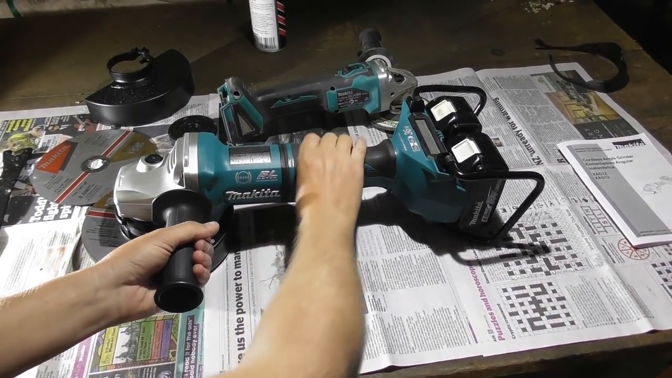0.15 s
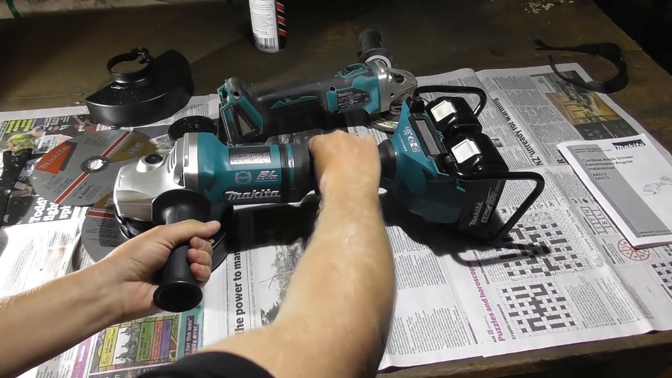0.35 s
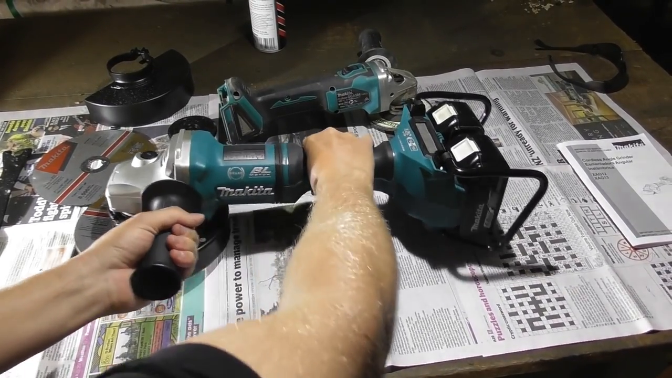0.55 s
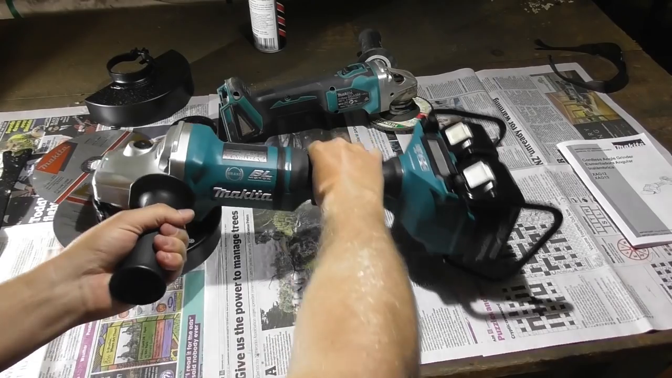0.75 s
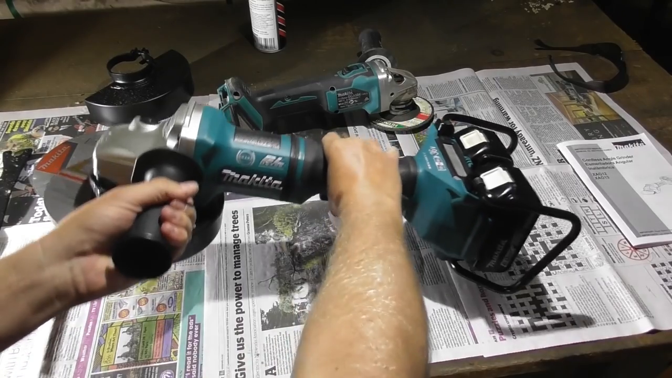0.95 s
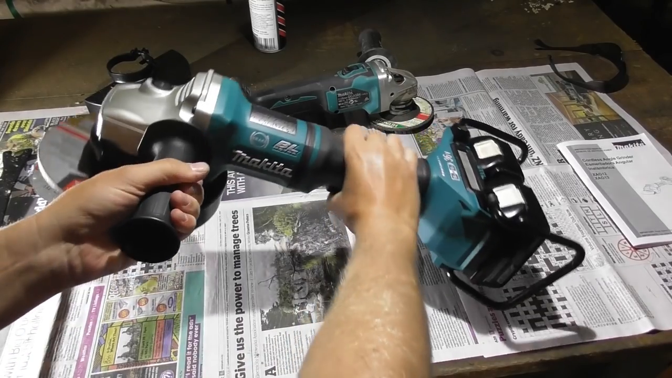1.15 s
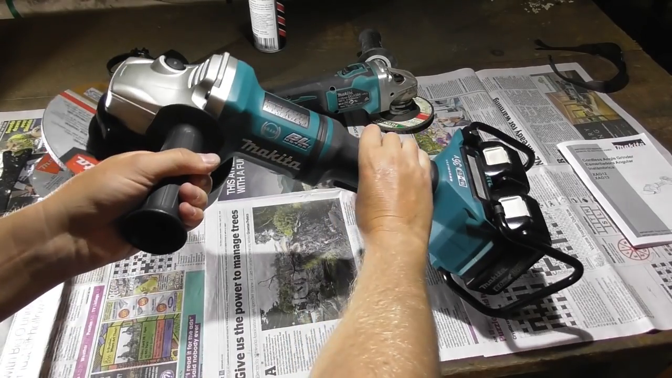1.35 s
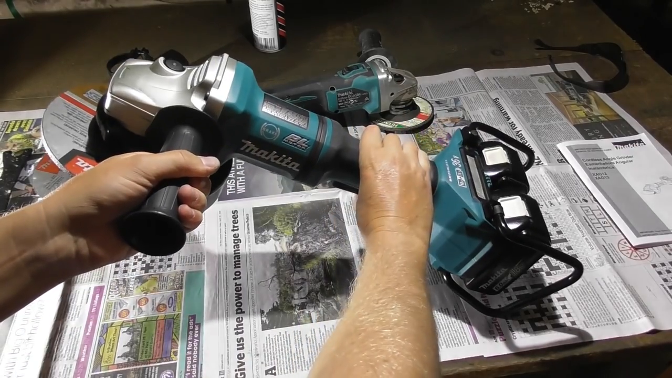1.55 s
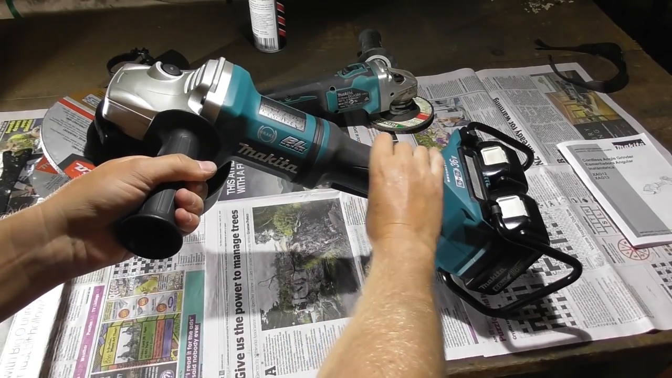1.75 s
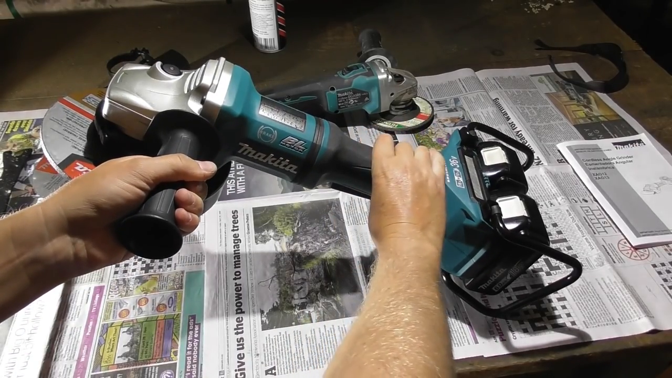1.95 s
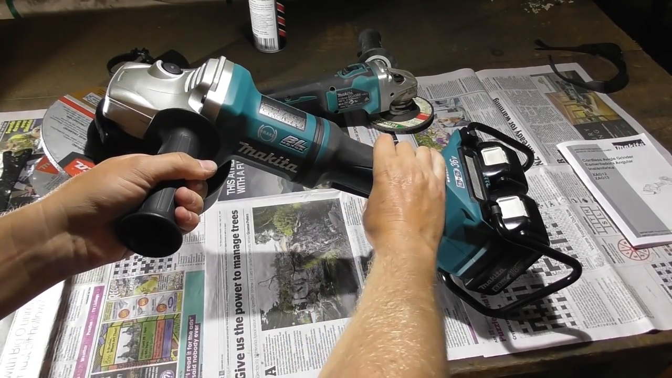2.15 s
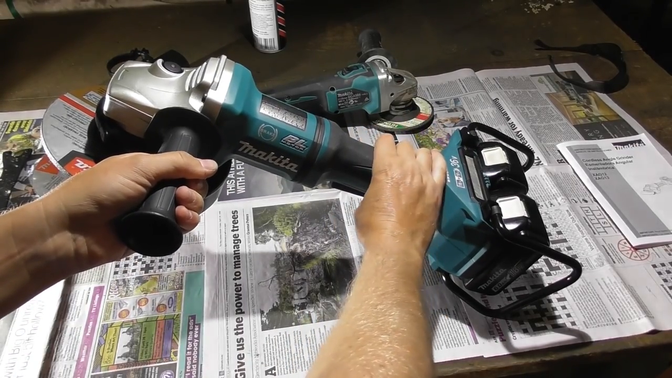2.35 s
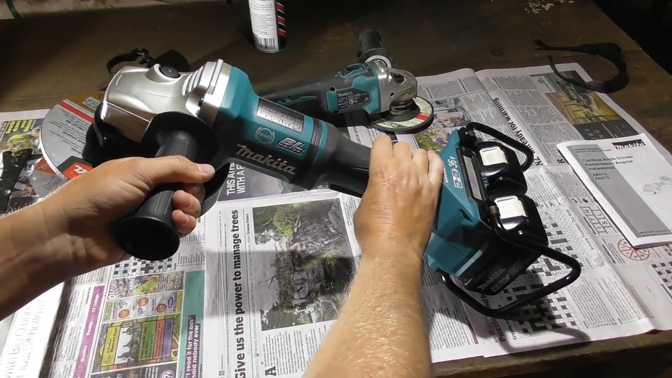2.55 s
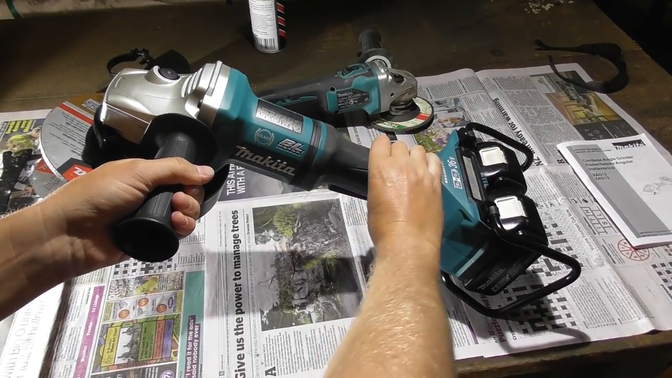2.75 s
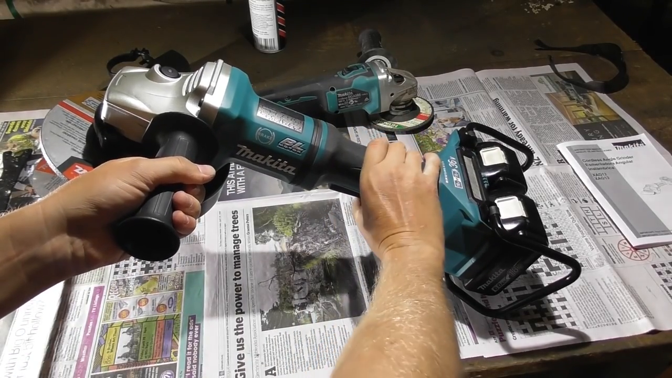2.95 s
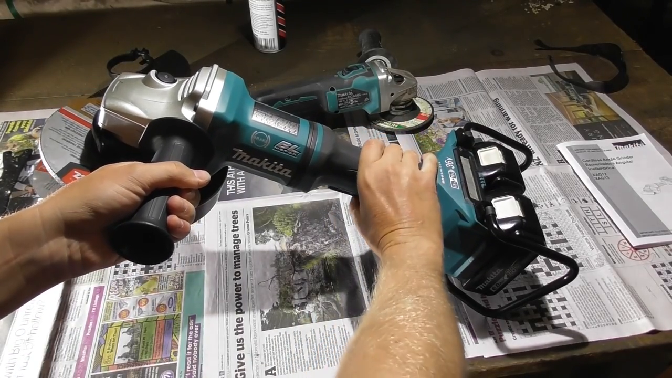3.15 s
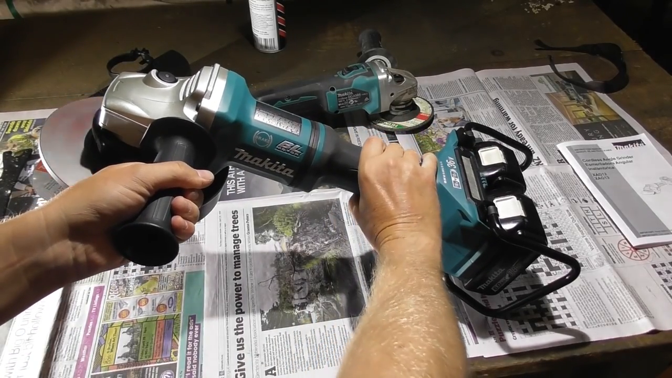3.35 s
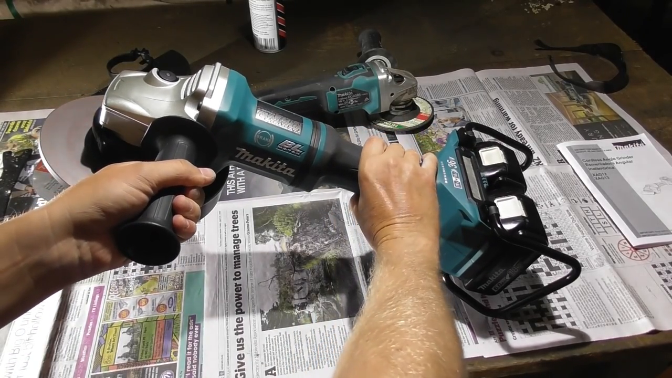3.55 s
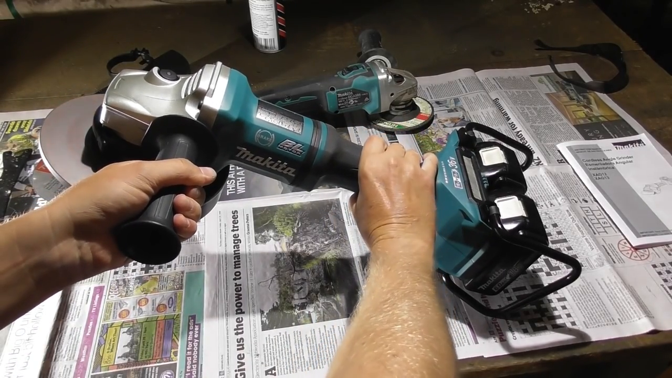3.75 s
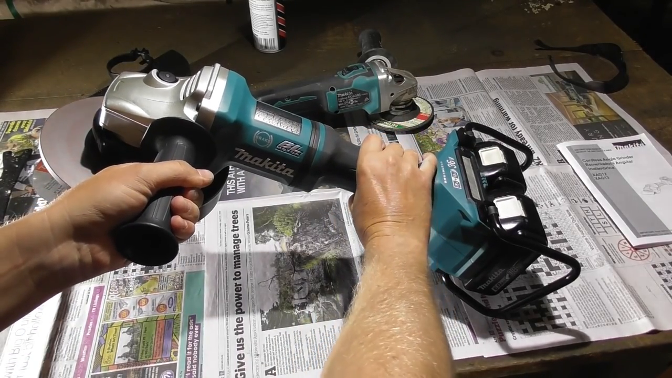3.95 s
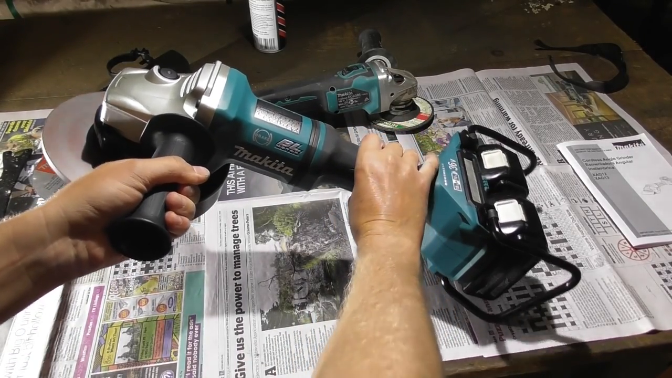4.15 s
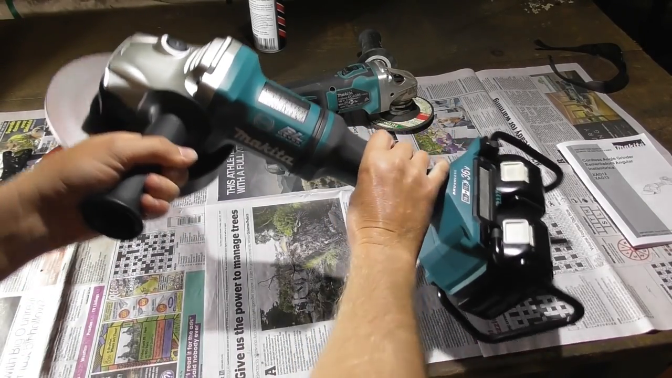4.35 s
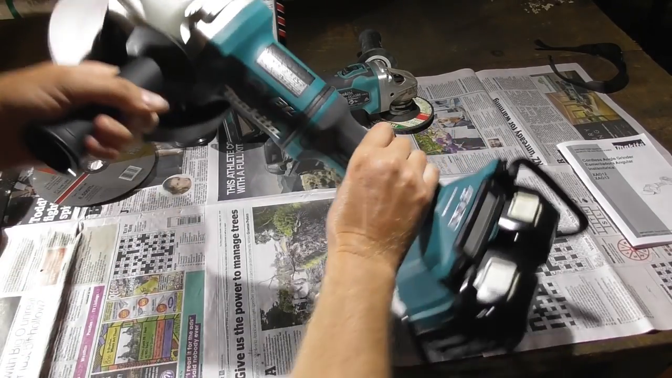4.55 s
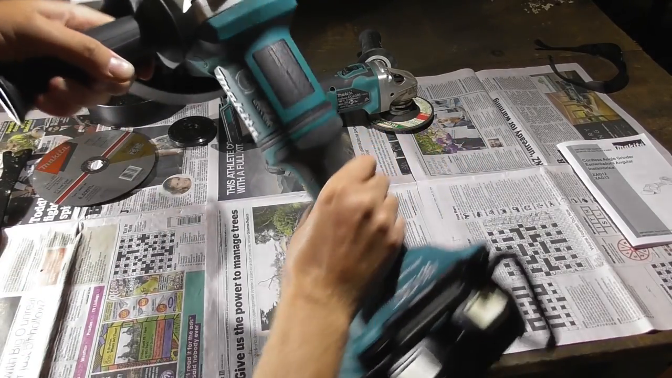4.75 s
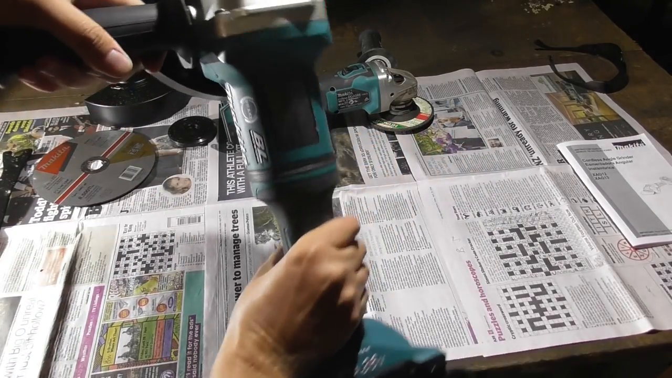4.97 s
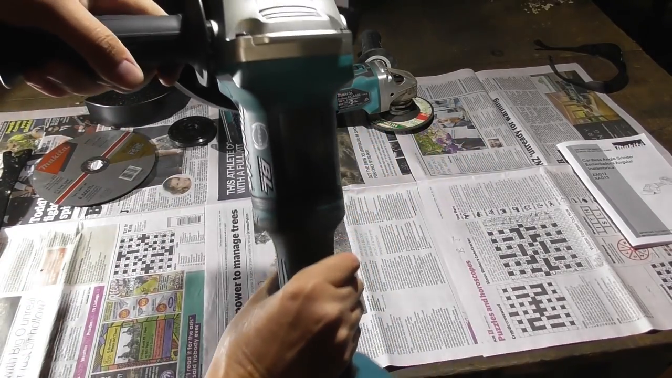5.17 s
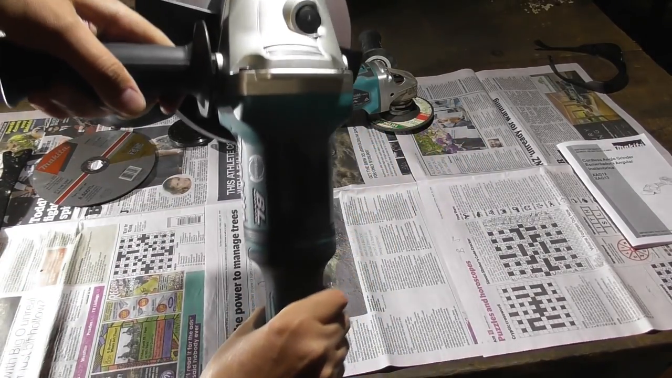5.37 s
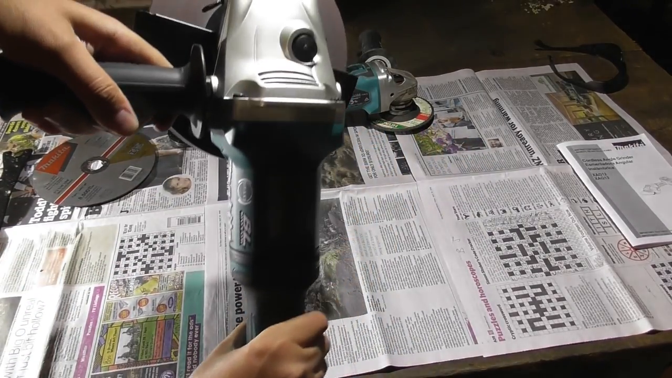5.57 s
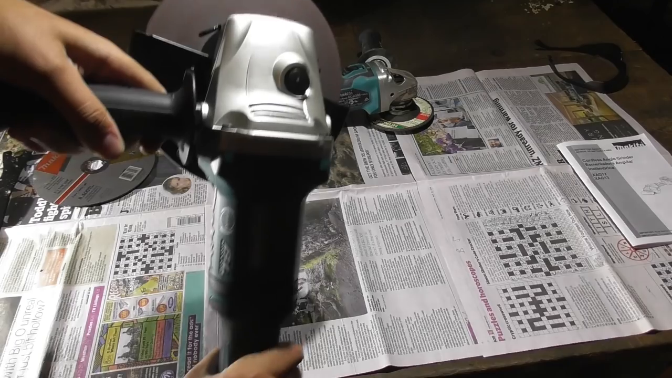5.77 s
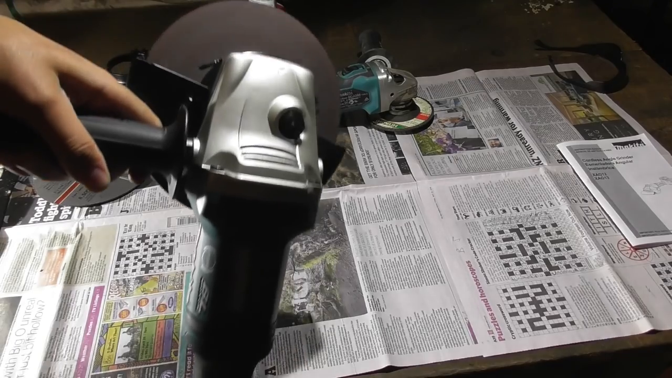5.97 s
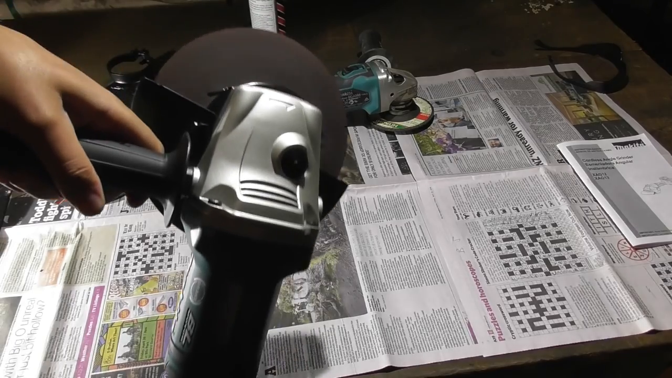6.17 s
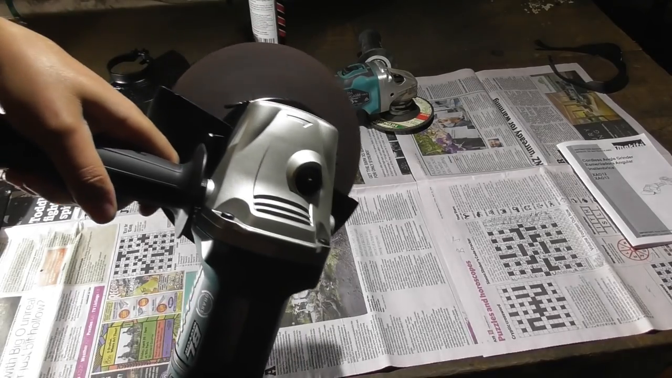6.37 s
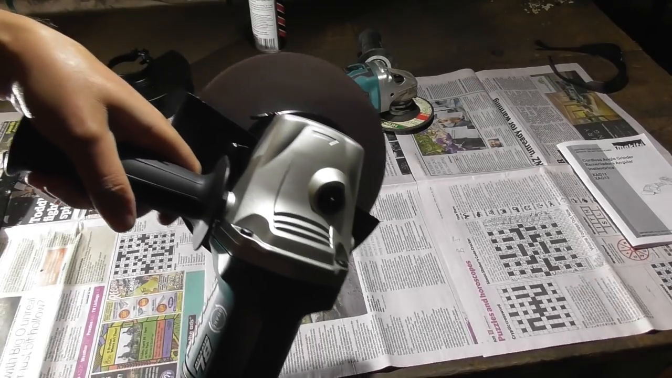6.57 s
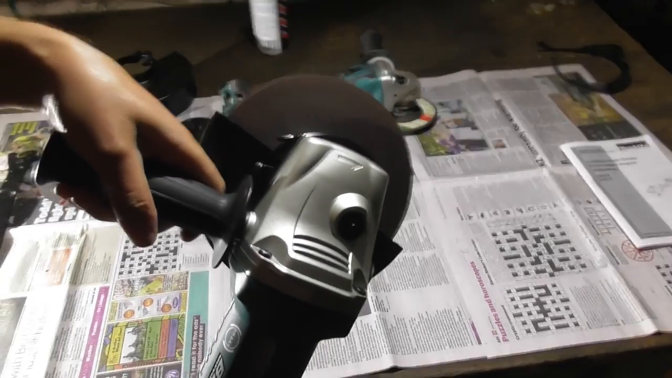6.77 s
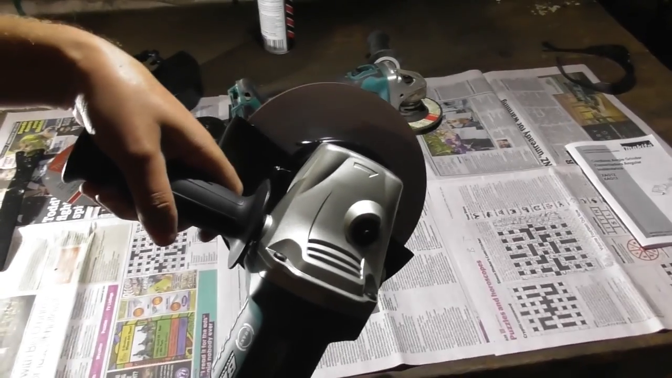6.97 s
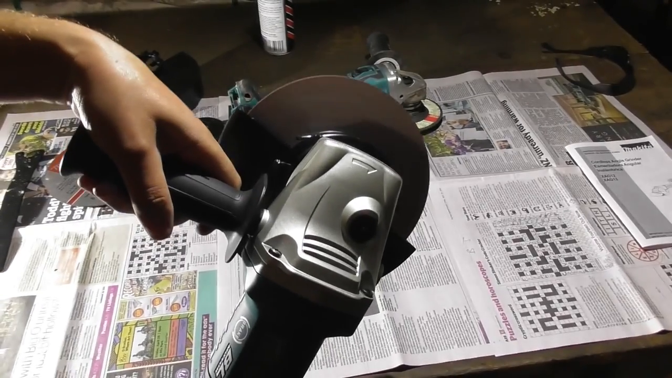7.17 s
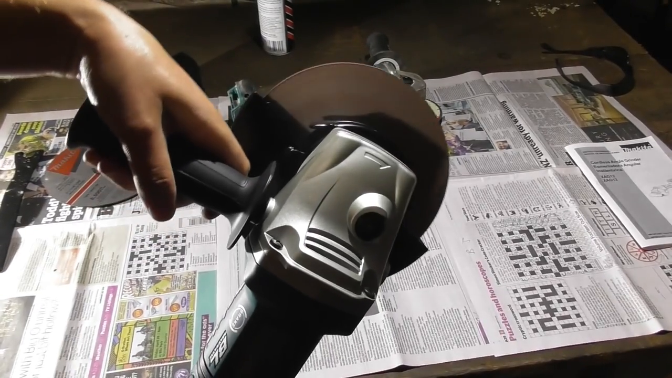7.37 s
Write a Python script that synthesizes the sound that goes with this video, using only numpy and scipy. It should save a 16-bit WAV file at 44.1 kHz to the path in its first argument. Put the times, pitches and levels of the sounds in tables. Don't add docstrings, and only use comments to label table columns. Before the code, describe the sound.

A low room hum and faint hiss lie under small finger knocks, grip rubs and one solid bench thud. A grip knock and tick come just before the loud switch snap. The grinder rattles abruptly, its motor and gear pitch racing up, then holds a harsh steady roar with whirring fan tone. Close stereo camera microphone, short room ring; the tone shifts slightly as the tool is turned and brought nearer.

```python
import sys
import numpy as np
from scipy import signal
from scipy.fft import rfft, irfft, next_fast_len
from scipy.io import wavfile
from scipy.ndimage import uniform_filter1d

SR = 44100
rng = np.random.default_rng(int(sys.argv[2]) if len(sys.argv) > 2 else 0)


def transcribe(u):
    v = np.clip(np.atleast_2d(u).T, -1, 1)
    q = np.round(v * 32767).astype(np.int16)
    wavfile.write(sys.argv[1], SR, q)


def ratio_of_db(decibels):
    return 10 ** (np.asarray(decibels, float) / 20)


N = 327222
T = np.arange(N) / SR
M = next_fast_len(N)
HZ = np.maximum(np.arange(M // 2 + 1) * SR / M, 1)
TEETH = 10
START_S = 3.33
RATTLE_END_S = 3.65

# t/s, shaft f/Hz
SHAFT_SPEED = [(3.33, 22), (3.39, 56), (3.46, 97.5), (3.54, 141.5), (3.64, 194), (3.75, 248.5), (3.82, 280),
               (3.88, 298.5), (3.94, 314), (3.99, 335), (4.04, 348), (4.11, 359), (4.17, 374.5),
               (4.27, 391.5), (4.436, 411), (4.62, 424.3), (4.836, 431.4), (5.4, 435.2)]
# t/s, head turned from side view [0-1], vents near camera [0-1]
TOOL_POSE = [
    (4.4, 0.1, 0),
    (4.8, 0.22, 0),
    (5.2, 1, 0),
    (5.75, 0.82, 0.14),
    (6.0, 1, 0.52),
    (6.3, 0.76, 0.55),
    (7.0, 1, 1.05),
    (7.42, 0.63, 1.1),
]


def grinder():
    shaft_hz = uniform_filter1d(curves(SHAFT_SPEED)[0], SR // 36)
    turned, near = curves(TOOL_POSE)
    on = np.clip((T - START_S + 0.012) / 0.03, 0, 1)
    turns = np.cumsum(shaft_hz * on * (1 + 0.0004 * walk(9))) / SR
    slack = (shaft_hz / shaft_hz.max()) ** 4.0
    state = np.array([np.ones(N), slack ** 2, turned, near])
    tooth = (TEETH * turns).astype(int)
    grain = tooth_bite(tooth)
    tones = mic(fan_tones(shaft_hz, turns, slack, state) + mesh_whine(shaft_hz, turns, slack, state))
    tones = tones + slack ** 2 * (0.27 + 0.74 * turned) * drive_tones(turned)
    case = shop(on * gear_case(tooth, grain))
    noise = air_roar(grain, shaft_hz, turned, near) + steel(grain, turned)
    return on * (noise + np.sqrt(2) * tones + case) + clatter()


def tooth_bite(tooth):
    bite_db = 0.93 * rng.standard_normal(TEETH)[tooth % TEETH]
    bite_db = bite_db + 1.7 * rng.standard_normal(N // 8)[tooth]
    return ratio_of_db(bite_db + 0.57 * walk(150))


# f/Hz, width/Hz, level/dB
SHELL_MODES = [(300, 90, 5), (466, 67, 3), (580, 110, 9), (684, 79, 12), (1075, 160, 12.5),
               (1405, 190, 14.5), (1987, 210, 14), (2400, 230, 11.5), (2820, 130, 8), (3030, 84, 12),
               (3303, 160, 10.5), (3480, 100, 8), (3580, 140, -8), (3840, 80, 6)]
# f/Hz, width/Hz, level/dB
HEAD_MODES = [(4100, 430, 5.5), (4220, 120, 6), (4500, 150, 8), (7300, 300, 5), (7870, 960, 12),
              (8300, 300, 4)]


def line_db(order, row, shaft_hz, state):
    whole_hz = np.arange(SR // 2)
    body_db = peaks_db(whole_hz, SHELL_MODES) + peaks_db(whole_hz, HEAD_MODES)
    return np.array(row) @ state + body_db[(order * shaft_hz).astype(int)]


FAN_ORDERS = [8, 16, 9, 4, 2, 1, .45, 3, 1.3235]
# level under load/dB, change at full speed/dB, change turned/dB, change near/dB
FAN_LEVELS = [(-64, 18.5, -7.5, 0.5), (-46, -15, 4, 11), (-57, -1, -3, -10), (-67.5, 13, -2, 5),
              (-56, -9, 4.5, -2), (-55, -14, 4.5, -4), (-49, -36, -6, 2), (-62, -5, -1, -4),
              (-62.5, -5.5, 3, 1.5)]


def fan_tones(shaft_hz, turns, slack, state):
    tones = 0
    for order, row in zip(FAN_ORDERS, FAN_LEVELS):
        level_db = line_db(order, row, shaft_hz, state)
        level_db = level_db + (2.0 + 1.2 / max(order, 1)) * walk(30) + 1.5 * slack * walk(6)
        radiated = 1 / (1 + (190 / (order * shaft_hz)) ** 4)
        phase = 2 * np.pi * (order * turns + rng.random()) + 0.064 * order * slack * walk(60)
        tones = tones + ratio_of_db(level_db) * radiated * np.sin(phase)
    return tones


MESH_ORDERS = [10, 20, 9, 11, 12, 19, 21, 11.5, 10.5, 22]
# level under load/dB, change at full speed/dB, change turned/dB, change near/dB
MESH_LEVELS = [(-42, -15, -0.5, -14), (-52, -6, -10, -1), (-57, 6, -10, -14), (-57, 9, -6, -5),
               (-61, 8, -6, -6), (-61, -2, -14, -3), (-59, 0, -12, -3), (-55.5, 2, -10, -3),
               (-58, 2, -8, -3), (-60, 0, -12, -3)]


def mesh_whine(shaft_hz, turns, slack, state):
    tones = 0
    for order, row in zip(MESH_ORDERS, MESH_LEVELS):
        chatter_rad = (0.035 + 0.19 * slack ** 3.7) * order
        level_db = line_db(order, row, shaft_hz, state) + 2.4 * walk(45)
        tones = tones + ratio_of_db(level_db) * np.sin(2 * np.pi * order * turns + chatter_rad * walk(260))
    return tones


# f/Hz, level/dB, side-view change/dB
DRIVE_LINES = [(489, -58, 0), (781, -52, -2), (1530, -71, 0), (7763, -71, 0), (8436, -64, 24)]


def drive_tones(turned):
    tones = 0
    for hz, db, side_db in DRIVE_LINES:
        level_db = db + side_db * (1 - turned) + 2.8 * walk(10)
        tones = tones + ratio_of_db(level_db) * np.sin(2 * np.pi * hz * T + 0.6 * walk(40))
    return tones


# f/Hz, width/Hz, level/dB
CASE_MODES = [(504, 190, -1.5), (2140, 155, 3.5), (2415, 70, -4), (3200, 160, -23), (3400, 120, 1),
              (4440, 190, 1), (3920, 120, -5), (5600, 200, -2), (7400, 460, -21), (10000, 400, -19)]


def gear_case(tooth, grain):
    blows = np.diff(tooth, prepend=0) * grain * rng.standard_normal(N)
    modes = sum(ratio_of_db(db) * np.sqrt(width) * ring(hz, 4.5 / width, 0.1) for hz, width, db in CASE_MODES)
    case = mic(signal.fftconvolve(blows, modes)[:N])
    case = signal.lfilter(*signal.butter(2, 330, "high", fs=SR), case)
    load = ratio_of_db(-31.0 - 7.7 * (T - START_S).clip(0))
    return load * case / np.sqrt(uniform_filter1d(case ** 2, SR // 8) + 1e-9)


# f/Hz, density/dB per Hz
ROAR_COLOUR = [(30, -35.5), (170, -19.5), (364, -11), (560, -11.5), (801, -4), (1550, -7), (1850, -5.5),
               (3300, 0), (4600, -7), (4710, -14.5), (5050, -24), (6300, -20.5), (7000, -18),
               (11400, -15.5), (16000, -33.5)]
# f/Hz, width/Hz, level/dB
GUARD_PEAKS = [(1040, 320, 3), (1925, 220, 6.5), (2120, 440, -2), (2610, 115, 3.5), (3110, 57, 3.5),
               (3540, 78, -4), (4100, 190, 2), (7000, 170, 4), (7820, 2200, 3.5), (9730, 950, -4),
               (6250, 420, -2)]
# f/Hz, correlation
ROAR_ALIKE = [(60, -1.4), (130, -0.21), (290, 0.84), (640, 0.91), (1410, 0.96), (3100, 0.94), (6820, 0.95),
              (15000, 0.56)]
# f/Hz, left minus right/dB
ROAR_SIDE = [(60, -15), (110, 3), (200, -5.5), (380, 1), (700, 5.5), (1290, 2.5), (2380, -0.5), (4400, -4),
             (8120, 2.5), (15000, 6)]
# low f/Hz, high f/Hz
ROAR_BANDS = [(250, 1200), (1500, 4500), (6500, 9000), (10000, 15000)]


def air_roar(grain, shaft_hz, turned, near):
    colour_db = at(ROAR_COLOUR, HZ) + peaks_db(HZ, GUARD_PEAKS)
    levels_db = roar_levels(shaft_hz, turned, near)
    return wash(grain, colour_db, ROAR_ALIKE, ROAR_SIDE, ROAR_BANDS, levels_db, 0.42, 14)


# level at speed/dB, growth [power of speed], change turned/dB, change near/dB
AIR_LEVELS = [(-36.5, 3.3, 1.5, 2.5), (-29.5, 2.1, 1, 2), (-38, 4.1, -6, 4.5), (-45.5, 1.5, 7.5, 0.5)]
# peak level/dB, peak t/s, rise/dB per s, fall/dB per s
RATTLE_LEVELS = [(-26.5, 3.425, 60, 84), (-26.5, 3.39, 150, 43), (-41.5, 3.46, 141, 27),
                 (-46.5, 3.57, 120, 3.5)]


def roar_levels(shaft_hz, turned, near):
    speed = shaft_hz / 316
    growth_db = 20 * np.log10(speed) - 2.5 * np.log10(1 + speed ** 8)
    air_db = np.array([db + power * growth_db + turn_db * turned + near_db * near
                       for db, power, turn_db, near_db in AIR_LEVELS])
    rattle_db = np.array([db - rise * (s - T).clip(0) - fall * (T - s).clip(0)
                          for db, s, rise, fall in RATTLE_LEVELS])
    rattle_db = rattle_db - 120.5 * (T - RATTLE_END_S).clip(0)
    return 10 * np.log10(ratio_of_db(air_db) ** 2 + ratio_of_db(rattle_db) ** 2)


# f/Hz, width/Hz, level in start rattle/dB, level near mesh overtone/dB, level turned/dB
STEEL_BANDS = [(4120, 780, -45, -31, -39.5), (5980, 400, -48.5, -70, -60), (7300, 380, -62, -48, -60),
               (7790, 670, -46.5, -48, -60), (10100, 760, -51.5, -61, -60), (8430, 200, -66, -48, -56),
               (8130, 520, -60, -45, -65), (5380, 740, -59, -69, -54.5)]


def steel(grain, turned):
    rattle = np.clip((T - RATTLE_LEVELS[0][1] + 0.055) / 0.051, 0, 1)
    rattle = rattle * ratio_of_db(-300 * (T - RATTLE_END_S).clip(0))
    sing = np.exp(-((T - 4.25) / 0.47) ** 2)
    noise = rng.standard_normal((3, N))
    source = grain * (noise[0] + 0.43 * noise[1:])
    out = 0
    for hz, width, rattle_db, sing_db, turn_db in STEEL_BANDS:
        edges_hz = [hz - width / 2, hz + width / 2]
        band = signal.sosfilt(signal.butter(4, edges_hz, "band", fs=SR, output="sos"), source)
        gain = rattle * ratio_of_db(rattle_db) + sing * ratio_of_db(sing_db) + turned * ratio_of_db(turn_db)
        out = out + band / band.std() * ratio_of_db(3.0 * walk(40)) * gain
    return out


# t/s, peak level/dB, steel ring/dB
GEAR_BLOWS = [(3.3165, -27, -4), (3.366, -23.5, -16), (3.382, -25, -17), (3.398, -17, -20),
              (3.406, -17, -22), (3.4155, -13.5, -17.5), (3.451, -21, -20), (3.473, -27, -16),
              (3.536, -27, -14), (3.648, -28, -10), (3.7214, -24, -14), (4.0322, -23, -16)]
# f/Hz, level/dB, t60/s
BLOW_CASE = [(473, -2, 0.035), (670, 2, 0.031), (2050, -7, .015), (3305, -1, .012)]
# f/Hz, level/dB, t60/s
BLOW_STEEL = [(5950, -1, .02), (7900, 0, .025)]


def clatter():
    track = np.zeros(N)
    for s, db, steel_db in GEAR_BLOWS:
        tight_db = -120 * max(s - 3.42, 0)
        for modes, gain_db in ((BLOW_CASE, db), (BLOW_STEEL, db + steel_db)):
            blow = 0
            for hz, mode_db, t60 in modes:
                level_db = mode_db + 2 * rng.standard_normal() + (hz < 1000) * tight_db
                blow = blow + ratio_of_db(level_db) * ring(hz * (1 + 0.015 * rng.standard_normal()), t60, 0.1)
            add(track, s, blow, gain_db)
    return shop(signal.lfilter(*signal.butter(3, 330, "high", fs=SR), track))


# f/Hz, left minus right/dB
HANDS_SIDE = [(100, -5), (250, -3), (500, 3), (1000, 2), (3000, -3), (10000, 0.5)]


def hands():
    track = np.zeros(N)
    bench_bumps(track)
    shell_knocks(track)
    switch_ticks(track)
    rubs(track)
    balance = ratio_of_db(np.outer([0.5, -0.5], at(HANDS_SIDE, HZ)))
    return irfft(rfft(shop(mic(track)), M) * balance, M)[:, :N]


# f/Hz, level/dB, t60/s
BENCH_MODES = [(70, -18, 0.3), (145, -17, 0.38), (150.9, -4, 0.45), (247.1, -1.5, 0.37), (298, -4, 0.3),
               (332, -7.5, 0.087), (366, -2.5, 0.18), (378, -13, 0.32), (521, -14, 0.23),
               (565, -12.5, 0.23), (689, -13, 0.25), (776, -26, 0.4), (1034, -27, 0.2), (1125, -30, 0.15)]
# t/s, peak level/dB, push/ms, direction
BENCH_BUMPS = [
    (0.8297, -1.5, 1.23, 1),
    (1.366, -29, 6.2, -1),
    (1.42, -35, 1.4, -1),
    (3.315, -40, 6.1, -1),
    (4.946, -34.5, 5.2, 1),
    (5.436, -44, 1.5, 1),
    (6.98, -36.5, 1.7, 1),
]


def bench_bumps(track):
    for s, db, push_ms, way in BENCH_BUMPS:
        body = sum(ratio_of_db(g) * ring(hz, 0.88 * t60, 0.5) for hz, g, t60 in BENCH_MODES)
        body = body + ratio_of_db(12) * burst(0.25, 150, 510) + ratio_of_db(7) * burst(0.3, 560, 1270)
        body = signal.lfilter(*signal.butter(2, 105, "high", fs=SR), body)
        push = np.hanning(int(push_ms * SR / 1000) + 3)
        add(track, s, way * np.convolve(body, push), db)


# t/s, peak level/dB, shell f/Hz, t60/s
SHELL_KNOCKS = [
    (0.239, -25, 645, 0.1),
    (.264, -35, 600, .08),
    (4.93, -29, 425, 0.1),
    (0.49, -30.5, 446, 0.063),
    (0.533, -43, 820, 0.22),
    (0.679, -37.5, 554, 0.064),
    (2.957, -22, 402, 0.093),
    (3.213, -35.5, 980, 0.076),
    (3.3, -31, 413, 0.051),
    (3.3163, -10.5, 760, 0.02),
]


def shell_knocks(track):
    for s, db, hz, t60 in SHELL_KNOCKS:
        modes = ring(hz, 0.65 * t60, 0.5) + 0.34 * ring(0.6 * hz, 0.5 * t60, 0.5)
        add(track, s, modes + 2.0 * burst(3.2 * t60, 0.72 * hz, 1.03 * hz), db)


# t/s, peak level/dB, ring f/Hz, t60/s, treble/dB
SWITCH_TICKS = [(0.147, -29, 1900, .02, -25), (1.417, -38, 1500, 0.015, -20),
                (0.2346, -37, 2300, 0.039, -26), (0.367, -44, 3700, 0.024, -26.5),
                (0.435, -37, 2010, 0.02, -26), (0.4947, -45, 2050, 0.024, -25),
                (0.5342, -44, 3530, 0.024, -19), (0.678, -38.5, 1490, 0.023, -31),
                (0.8322, -24, 3030, 0.03, -17), (1.352, -51, 1710, 0.024, -4),
                (2.188, -40.5, 3300, 0.03, -14), (2.718, -38, 3340, 0.02, -18),
                (2.959, -22.5, 2190, 0.018, -25), (3.213, -29.5, 2950, 0.042, -13),
                (3.26, -41, 3060, 0.03, -21), (3.2984, -29, 2290, 0.015, -31.5),
                (3.3163, -10, 3110, 0.034, -14.5)]


def switch_ticks(track):
    for s, db, hz, t60, treble_db in SWITCH_TICKS:
        tick = burst(0.5 * t60, 750, 0.96 * hz) + 0.24 * burst(2.85 * t60, 970, 3070)
        add(track, s, tick + 0.17 * ring(hz, 1.0 * t60, 0.5), db - 0.5)
        add(track, s, burst(0.3 * t60, 5400, 16500), db + treble_db + 15.5)


# t/s, length/s, level/dB, low f/Hz,
# high f/Hz
HAND_RUBS = [(0.004, .1, -68, 2800, 4200), (0.11, 0.12, -49.5, 800, 3300), (.12, .1, -53, 5000, 15000),
             (0.13, 0.033, -49, 990, 2600), (.25, 0.36, -56, 570, 740), (0.53, 0.1, -66, 2900, 3600),
             (0.55, .1, -57, 5700, 15000), (.7, .12, -68, 2900, 4100), (.84, 0.3, -46, 32, 234),
             (1.245, 0.12, -65.5, 2700, 4200), (1.39, 0.074, -54, 230, 790), (1.69, 0.19, -64, 3000, 3800),
             (1.76, 0.11, -61, 7000, 15000), (2.52, 0.18, -66, 3100, 3860), (2.747, 0.097, -67, 3300, 4600),
             (2.952, 0.052, -40.5, 480, 810), (2.96, 0.054, -56.5, 3200, 3500),
             (3.312, 0.027, -31, 20, 290), (3.36, 0.071, -30, 400, 540), (4.925, 0.09, -48, 200, 620),
             (4.925, .03, -59, 30, 160), (4.95, .15, -56, 110, 300)]


def rubs(track):
    for s, length_s, db, lo_hz, hi_hz in HAND_RUBS:
        slide = burst(np.inf, lo_hz, hi_hz)[:int(length_s * SR)]
        add(track, s, slide * np.hanning(len(slide)) ** 0.39, db + 11.0)


# t/s, effort [0-1]
HAND_EFFORT = [(0, 0.6), (.14, 0.56), (.4, 0.88), (.64, 0.4), (.98, 1), (1.2, 0.6), (1.41, 0.73),
               (1.7, 0.45), (2.4, 0.22), (2.85, 0.27), (3.3, 0.54)]
# level at rest/dB, added by full effort/dB
STILL_LEVELS = [(-55, 12.5), (-55, 3), (-69, 4.5), (-72, 4)]
# f/Hz, density/dB per Hz
QUIET_COLOUR = [(15, -46), (25, -3.5), (59, -5), (114, -13), (223, -7.5), (326, -13.5), (384, -10.5),
                (936, -16), (1400, -30), (1740, -24), (2840, -35.5), (3250, -30), (5000, -51),
                (8830, -36.5), (16000, -39)]
# f/Hz, correlation
QUIET_ALIKE = [(60, 0.98), (130, 1), (290, 0.97), (640, 0.9), (1410, 0.96), (3100, 1), (6820, 0.86),
               (15000, 0.31)]
# f/Hz, left minus right/dB
QUIET_SIDE = [(60, -3.5), (110, -4), (200, -2), (380, 1), (700, 1), (1290, -0.5), (2380, -1), (4400, -3),
              (8120, 1.5), (15000, 0.5)]
# low f/Hz, high f/Hz
QUIET_BANDS = [(25, 100), (200, 1100), (2600, 4800), (6000, 15000)]


def quiet():
    effort = curves(HAND_EFFORT)[0]
    jolt_s, jolt_width_s, jolt_db = 3.322, 0.008, 12
    duck_s, duck_db = 0.34, -31
    gain_db = jolt_db * np.exp(-((T - jolt_s) / jolt_width_s) ** 2)
    gain_db = gain_db + duck_db * (1 - np.exp(-(T - jolt_s).clip(0) / duck_s))
    levels_db = np.array([db + busy_db * effort for db, busy_db in STILL_LEVELS]) + gain_db
    grain = ratio_of_db(0.79 * walk(60))
    return wash(grain, at(QUIET_COLOUR, HZ), QUIET_ALIKE, QUIET_SIDE, QUIET_BANDS, levels_db, 2.15, 9.3)


def shop(x):
    t60_s, wet_db = 0.27, -5.5
    s = np.arange(SR // 2) / SR
    noise = rng.standard_normal((3, len(s)))
    tail = (noise[0] + 0.82 * noise[1:]) * (s > 0.004)
    tail = signal.lfilter(*signal.butter(2, 220, "high", fs=SR), tail)
    low = signal.lfilter(*signal.butter(1, 1400, fs=SR), tail)
    tail = low * 1000.0 ** (-s / t60_s) + 0.5 * (tail - low) * 1000.0 ** (-s / (1.35 * t60_s))
    tail = tail / np.sqrt(np.mean(np.abs(rfft(tail)[:, 50:500]) ** 2))
    return x + ratio_of_db(wet_db) * signal.fftconvolve(x[None], tail, axes=1)[:, :N]


# f/Hz, level/dB
MIC_RESPONSE = [(20, -2), (4580, 3.5), (4720, -9), (5100, -14), (6300, -6), (8000, -2.5), (16000, -18.5)]


def mic(x):
    return irfft(rfft(x, M) * ratio_of_db(at(MIC_RESPONSE, HZ)), M)[..., :N]


def wash(grain, colour_db, alike, side_db, bands, levels_db, flicker_db, rate_hz):
    likeness = np.clip(at(alike, HZ), -0.99, 0.99)
    spectrum = rfft(grain * rng.standard_normal((2, N)), M) * ratio_of_db(colour_db)
    mid, side = spectrum * np.sqrt([(1 + likeness) / 2, (1 - likeness) / 2])
    ears = np.array([mid + side, mid - side]) * ratio_of_db(np.outer([0.5, -0.5], at(side_db, HZ)))
    power = np.abs(ears.mean(0)) ** 2 * 2 / M / N
    gain_db = levels_db - [[10 * np.log10(power[(HZ > lo) & (HZ < hi)].sum())] for lo, hi in bands]
    centres = np.log([np.sqrt(lo * hi) for lo, hi in bands])
    ears, octaves = ears.astype(np.complex64), np.log2(HZ).astype(np.float32)
    out = 0
    for step in range(20):
        hz = 22 * 2 ** (step / 2)
        share = [np.interp(np.log(hz), centres, row) for row in np.eye(len(bands))]
        window = np.clip(1 - np.abs(2 * (octaves - np.float32(np.log2(hz)))), 0, 1)
        band = irfft(ears * window, M)[:, :N]
        flicker = flicker_db * min(1, np.sqrt(2500 / hz)) * walk(rate_hz)
        out = out + band * ratio_of_db(share @ gain_db + flicker)
    return out


def ring(hz, t60, length_s=0.6):
    s = np.arange(int(length_s * SR)) / SR
    return np.sin(2 * np.pi * hz * s) * 1000.0 ** (-s / t60)


def burst(t60, lo_hz, hi_hz):
    s = np.arange(SR // 2) / SR
    noise = rng.standard_normal(len(s)) * 1000.0 ** (-s / t60)
    return signal.lfilter(*signal.butter(2, [lo_hz, hi_hz], "band", fs=SR), noise)


def add(track, s, sound, db):
    i = int(s * SR)
    track[i:i + len(sound)] += (sound * ratio_of_db(db) / np.abs(sound).max())[:N - i]


def walk(rate_hz):
    k = int(SR / rate_hz)
    held = np.repeat(rng.standard_normal(N // k + 1), k)
    return 1.3 * uniform_filter1d(uniform_filter1d(held, k), k)[:N]


def peaks_db(hz, table):
    return sum(db / (1 + (2 * (hz - f) / width) ** 2) for f, width, db in table)


def curves(table):
    s, *columns = np.transpose(table)
    return np.array([np.interp(T, s, c) for c in columns])


def at(points, hz):
    f, value = np.array(points)[:, 0], np.array(points)[:, 1]
    return np.interp(np.log(hz), np.log(f), value)


def scene():
    return grinder() + hands() + quiet()


def top_cut(x):
    return signal.sosfilt(signal.butter(12, 15850, fs=SR, output="sos"), x)


# f/Hz, left lead/rad
PORT_LEAD = [(60, 0.11), (260, 0.65), (1200, -0.33), (4650, -0.38), (6000, 1), (7000, 1.28), (8600, 1.34),
             (10300, 0.7)]


def record(dry):
    lead = np.exp(1j * np.outer([0.5, -0.5], at(PORT_LEAD, HZ)))
    ports = irfft(rfft(dry, M) * lead, M)[:, :N]
    rounded = np.tanh(0.39 * ports) / 0.39
    mix = signal.sosfilt(signal.ellip(8, 0.2, 60, 15850, fs=SR, output="sos"), rounded)
    return top_cut(mix)


dry = scene()
out = record(dry)
transcribe(out)
```